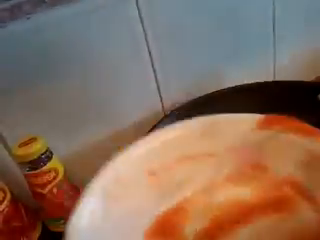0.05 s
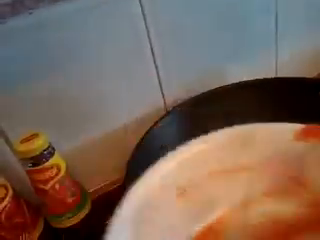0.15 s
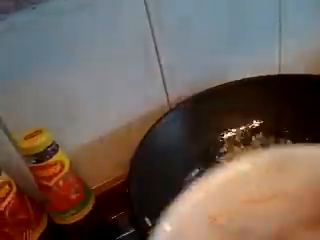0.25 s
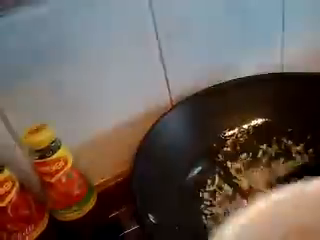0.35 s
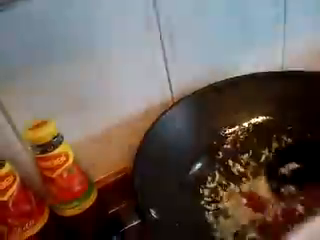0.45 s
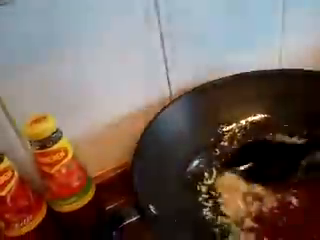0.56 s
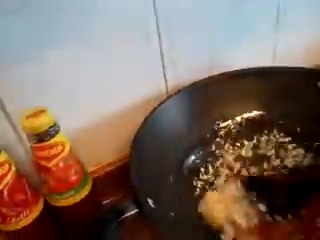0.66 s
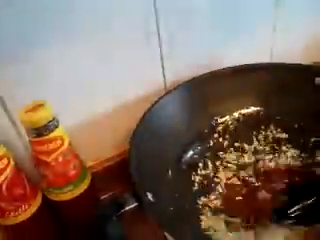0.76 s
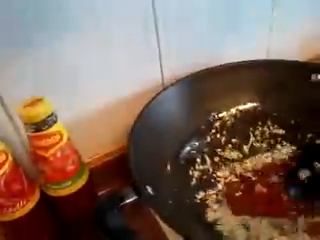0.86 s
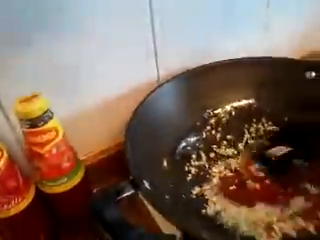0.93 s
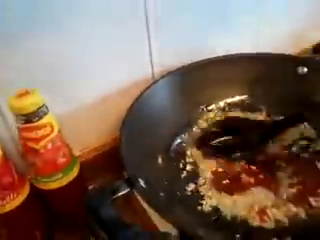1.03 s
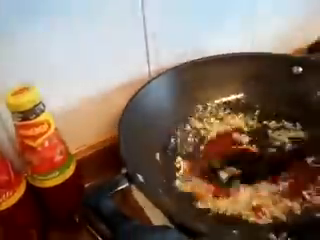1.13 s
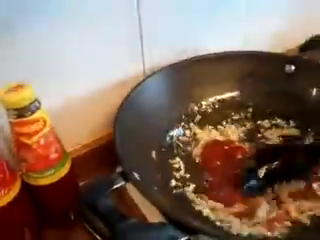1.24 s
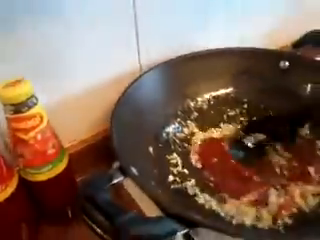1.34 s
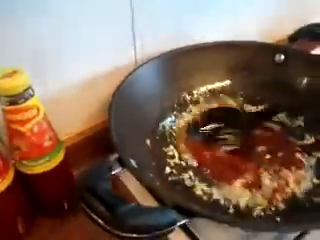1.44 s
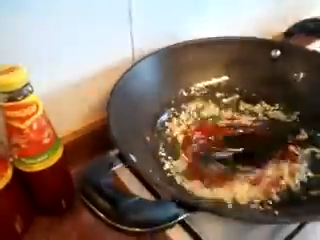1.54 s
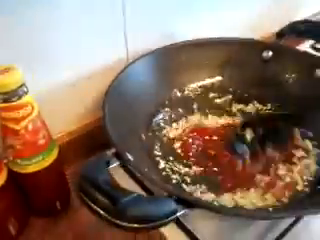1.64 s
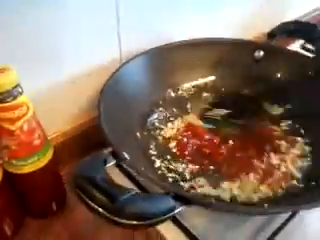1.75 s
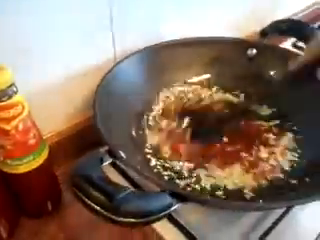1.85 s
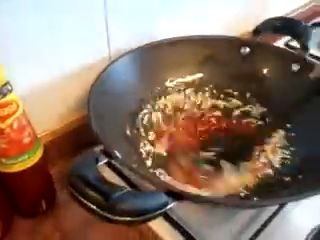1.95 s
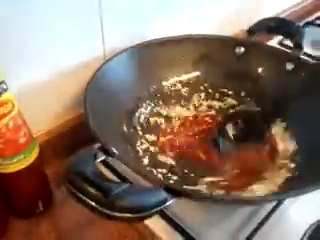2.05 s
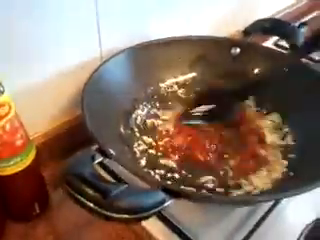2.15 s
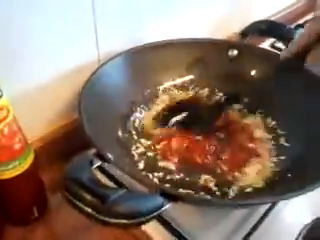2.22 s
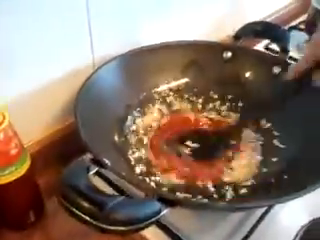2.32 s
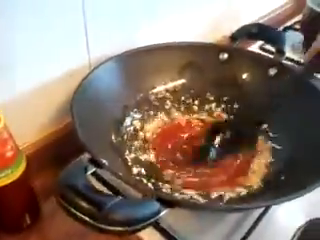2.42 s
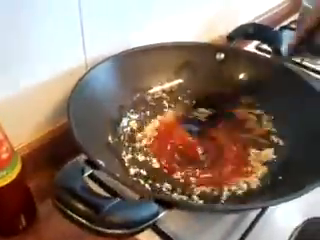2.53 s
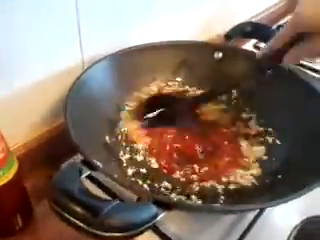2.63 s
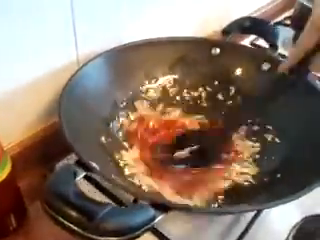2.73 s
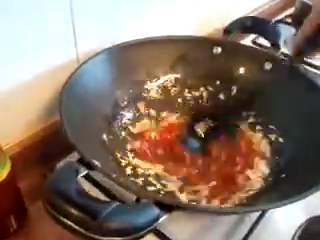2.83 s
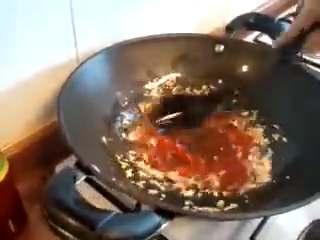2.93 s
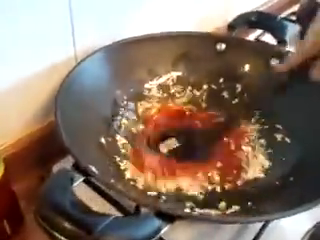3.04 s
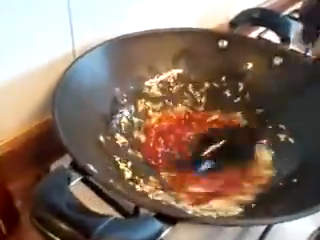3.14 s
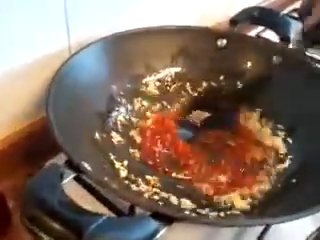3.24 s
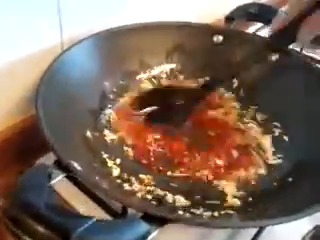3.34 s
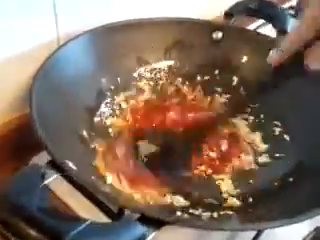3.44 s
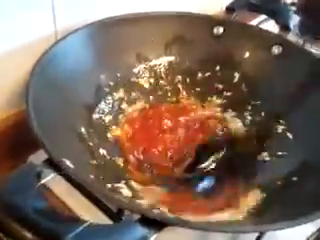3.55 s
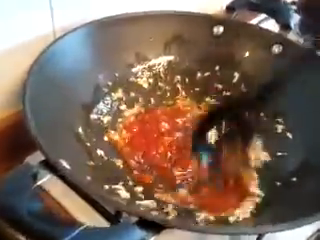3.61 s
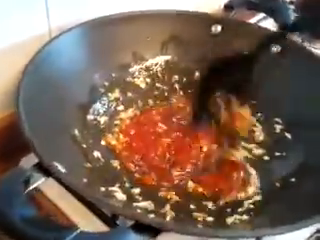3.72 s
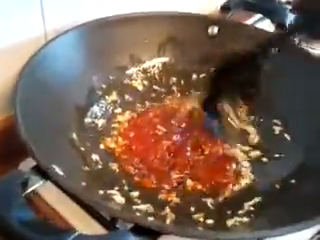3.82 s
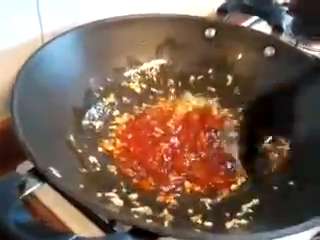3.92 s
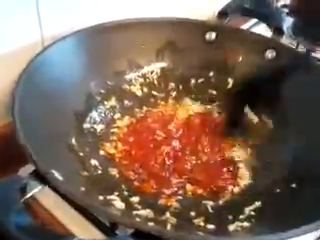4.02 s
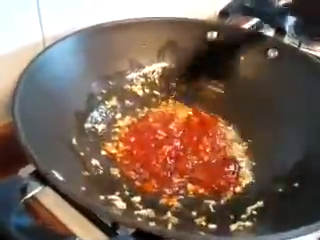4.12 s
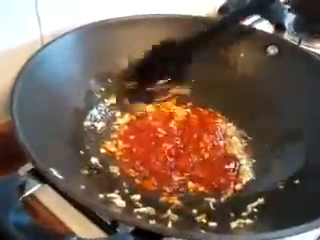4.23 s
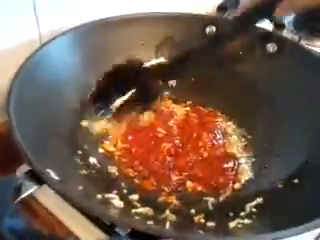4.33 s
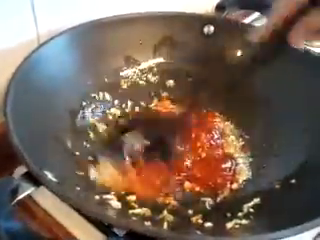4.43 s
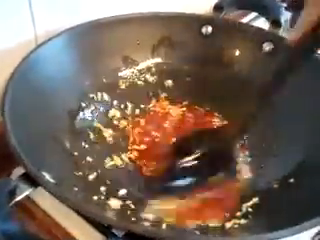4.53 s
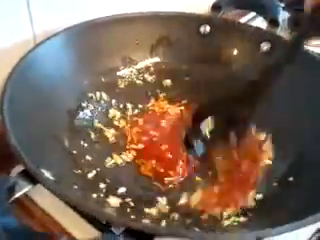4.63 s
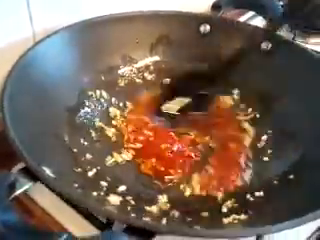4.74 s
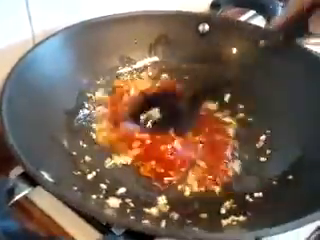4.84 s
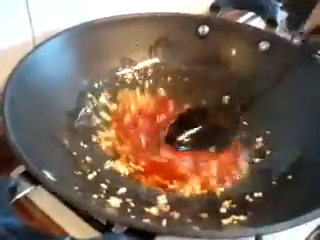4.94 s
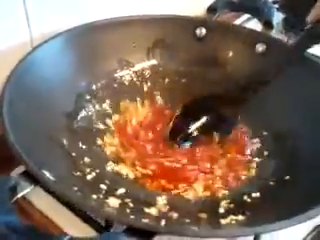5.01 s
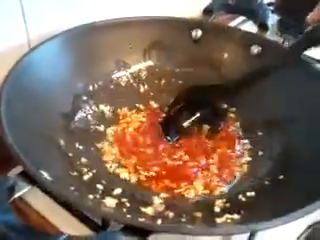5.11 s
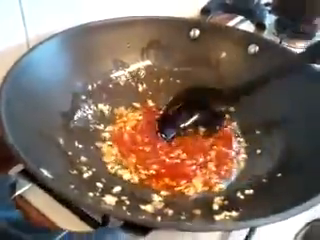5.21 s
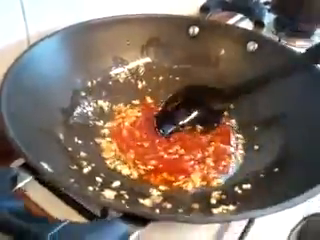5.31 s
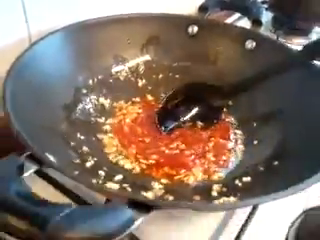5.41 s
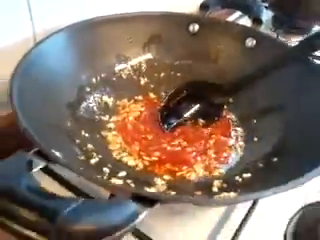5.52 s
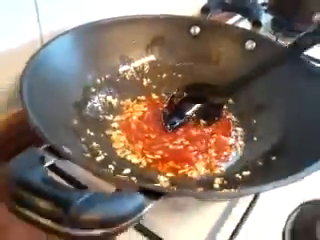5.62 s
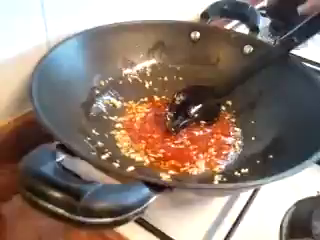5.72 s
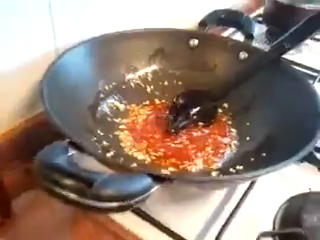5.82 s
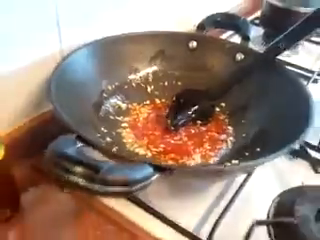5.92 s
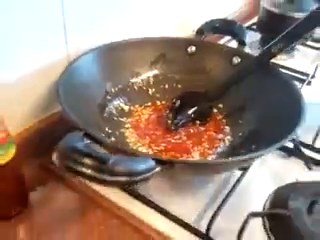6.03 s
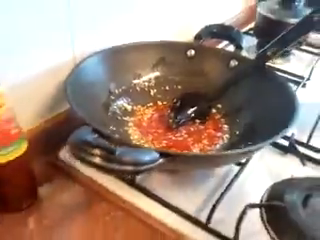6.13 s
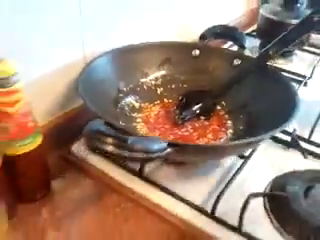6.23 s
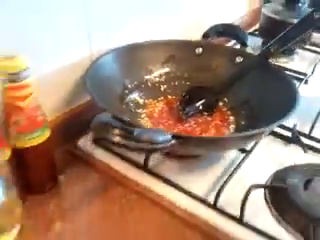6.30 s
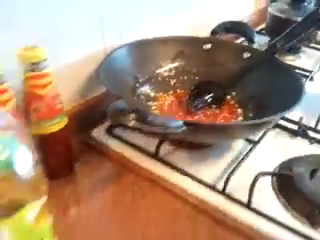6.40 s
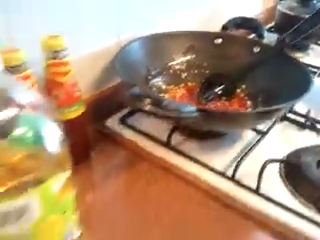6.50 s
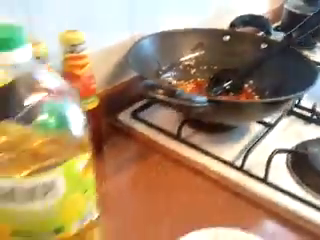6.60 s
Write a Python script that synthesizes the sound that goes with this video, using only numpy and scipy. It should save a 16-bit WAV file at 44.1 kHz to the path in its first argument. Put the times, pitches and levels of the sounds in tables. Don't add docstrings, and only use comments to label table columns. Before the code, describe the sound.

Close-up wok frying: fine fizz, crackling bubbles and wet seething, pulsing with quick spatula strokes. A loud spit and bursts of steam come near three seconds, a brief low pan groan follows, then a bright clack just after four. Late on, a few small knocks tick as the microphone backs away and the frying drops quieter, leaving low kitchen fan noise underneath.

```python
import sys
import numpy as np
from scipy import signal
from scipy.fft import rfft, irfft
from scipy.io import wavfile
from scipy.ndimage import uniform_filter1d

SR = 44100
rng = np.random.default_rng(int(sys.argv[2]) if len(sys.argv) > 2 else 0)


def bounce(signal):
    frames = np.transpose(np.atleast_2d(signal))
    limited = np.clip(frames, -1, 1)
    pcm = np.round(limited * 32767).astype(np.int16)
    wavfile.write(sys.argv[1], SR, pcm)


def convert_level_to_amplitude(level_db):
    exponent = np.asarray(level_db, float) / 20
    return 10 ** exponent


N = 293787

# lower edge in Hz, upper edge in Hz.
FRYING_BANDS = [
    (6000, 9000),
    (3800, 6000),
    (1600, 3800),
    (500, 1500),
]
# frequency in Hz, density in dB per Hz.
FRYING_SPECTRUM = [(150, -44), (260, -15), (520, -14), (900, -11), (1450, -9), (1700, -6.5), (3300, -5.5),
                   (4200, -4), (5000, -1), (6200, -4), (7500, -4), (8200, -7.5), (9200, -16)]
# frequency in Hz, width in Hz, gain in dB.
PAN_MODES = [(540, 32, 3.5), (687, 16, 9), (850, 19, 6), (1033, 81, 4), (1137, 19, 9), (1210, 20, 0.5),
             (1480, 250, -1.5), (1650, 48, 3), (1787, 14, 7.5), (1900, 23, 5.5), (2178, 15, 7),
             (2450, 17, 5), (6870, 91, 0)]
# start in seconds, length in seconds, rms level in dB,
# centre in Hz, width in Hz.
STEAM_FLARES = [(0.136, 0.054, -38, 590, 400), (0.375, 0.054, -33, 1150, 400),
                (0.384, 0.026, -27.5, 1900, 300), (1.706, 0.091, -36.5, 1750, 250),
                (2.126, 0.024, -50, 2220, 200), (2.263, 0.01, -32, 850, 300),
                (2.268, 0.083, -20, 6060, 3530), (2.298, 0.022, -19.5, 6650, 1500),
                (2.897, .01, -16, 7260, 1900), (2.994, 0.05, -27.5, 2960, 1500),
                (3.022, 0.044, -23, 5556, 3780), (3.066, 0.022, -23.5, 2730, 1600),
                (3.061, 0.03, -22.5, 5270, 3000), (3.08, 0.022, -24, 4700, 2000),
                (4.342, 0.0201, -31.5, 1930, 560), (4.838, 0.02, -27, 3430, 300),
                (4.85, .06, -30, 4760, 2500), (5.785, 0.02, -46, 1900, 900),
                (5.944, 0.036, -37.5, 2500, 1100), (5.972, 0.019, -37.5, 1720, 500),
                (6.307, 0.017, -44, 2720, 800), (6.35, .015, -51, 1740, 200),
                (6.38, 0.0152, -46, 1650, 200), (6.394, 0.074, -44, 1720, 400)]
# start in seconds, peak level in dB, pitch in Hz.
OIL_SPITS = [(0.4953, -10, 7050), (0.7407, -7, 7210), (0.9931, -9, 7400), (1.0266, -4, 7870),
             (1.5424, -8, 7580), (1.5514, -8, 6640), (1.6192, -8, 6210), (1.7669, -10, 7220),
             (1.8647, -8, 7720), (2.8985, 1, 7300), (3.0325, -9, 6500), (3.0484, -8, 5150),
             (3.0865, -9, 7300), (3.0744, -7, 4480), (4.2224, -11, 7090), (4.2465, -14, 5200),
             (4.3979, -11, 6910), (4.4523, -14, 7300), (4.6414, -13, 6840), (5.024, -11, 7680),
             (5.5209, -20, 6500), (5.5737, -17, 7230), (5.8501, -20, 7220), (5.8765, -20, 6990),
             (5.8975, -17, 6750), (6.1105, -22, 6620), (6.1978, -21, 5480), (6.2871, -22, 5480),
             (6.3789, -23, 7010), (6.5545, -26, 6360)]
# start in seconds, peak level in dB, lowest ring in Hz, T60 in seconds,
# bright crack level in dB.
SPATULA_KNOCKS = [(.887, -27, 1140, .05, -40), (2.107, -27, 1000, .05, -40), (2.69, -30, 1020, .05, -45),
                  (4.2505, -17.5, 690, .08, -7.5), (5.585, -33, 1330, .04, -45),
                  (5.6224, -11, 730, .026, -34), (5.6325, -27, 700, .025, -45),
                  (5.6375, -28, 720, .08, -45), (5.825, -23, 320, .05, -55), (5.843, -24, 660, .06, -45),
                  (5.948, -33, 550, .03, -45), (6.0175, -20, 395, .055, -55), (6.199, -30, 700, .025, -45),
                  (6.208, -27, 900, .03, -45), (6.217, -22, 600, .02, -45), (6.228, -26, 850, .025, -45)]
# ratio to the lowest ring, level in dB.
BLADE_PARTIALS = [(1, -2), (1.12, -3), (1.38, -1), (1.55, -4), (1.75, -3), (2.05, -5), (2.5, -9)]
# frequency in Hz, level in dB, T60 in seconds.
CRACK_MODES = [(1150, -10, .025), (1550, -12, .02), (2000, -11, .025), (2900, -9, .02), (3700, -8, .02),
               (4630, -5, .04), (4950, 0, .04), (5550, -4, .03), (6190, -4, .03), (6490, -2, .025),
               (6950, -1, .025), (7600, -6, .03)]
# frequency in Hz, density in dB per Hz.
ROOM_SPECTRUM = [(8.8, -30), (15, -1.5), (46, 2.5), (76, -2), (140, -3), (210, -12), (481, -14),
                 (595, -21.5), (963, -18), (1040, -23), (1150, -16.5), (1340, -18), (1500, -17),
                 (1950, -44.5), (3300, -120)]
# time in seconds, pitch in Hz, level in dB.
PAN_GROAN = [
    (3.66, 142, -60),
    (3.72, 138, -41),
    (3.8, 124, -35),
    (3.87, 116, -37),
    (3.92, 112, -60),
]
# frequency in Hz, gain in dB.
MIC_RESPONSE = [(7600, 1), (8100, -0.5), (8550, -9.5), (8850, -18), (9150, -41.5), (9300, -88.5)]
# time in seconds, level in dB.
SIZZLE_LEVEL = [(0, -18.5), (.1, -18), (.32, -19.5), (.6, -23.5), (.78, -19), (.93, -22), (1.15, -19.5),
                (1.5, -18.5), (1.68, -22.5), (1.87, -21.5), (2.0, -25.5), (2.2, -23.5), (2.72, -25.5),
                (2.95, -24.5), (4.3, -27.5), (5.2, -25.5), (5.6, -34.5), (6.66, -42.5)]
# level in dB when the sizzle is at -25 dB, share of its change (a ratio).
FRYING_LAYERS = [
    (-25.5, 0.99),
    (-29.5, 1.01),
    (-32, 0.91),
    (-42.5, 0.52),
]
# middle in seconds, length in seconds, ring in Hz, ring lift in dB,
# lift in dB of the seething, turned-over sauce.
SPATULA_STROKES = [(0.057, 0.37, 1250, 5, -0.5), (0.284, 0.35, 1190, 6.5, -3.5), (0.572, 0.34, 1308, 4, 3),
                   (0.794, 0.79, 850, 6, 1.5), (1.107, 0.4, 1000, 2.5, 0.5), (1.294, 0.3, 1000, 1, 1),
                   (1.49, .25, 750, 8, 0), (1.75, 0.34, 1050, 3.5, 0), (2.067, 0.32, 804, 7.5, 1.5),
                   (2.3, .15, 650, 12, 4), (2.54, 0.28, 1030, 3, -0.8), (2.76, 0.25, 1210, 8, -1.5),
                   (2.864, 0.17, 1000, 3.5, 1), (3.064, 0.19, 793, 0.5, 3.5), (3.284, 0.27, 1158, 5, 0.5),
                   (3.443, 0.099, 1100, 1, 2.5), (3.771, 0.26, 1400, 0.5, 3), (3.965, 0.41, 1070, 4.5, 3),
                   (4.4, 0.26, 1400, 3, 1.5), (4.672, 0.185, 1360, 5, 1), (4.95, 0.46, 1550, 4.5, -1),
                   (5.03, 0.2, 650, 7, -0.5), (5.366, 0.33, 1400, 2.5, 0.5), (5.6, 0.2, 1350, -1, 1.2)]


def evened(x):
    return x / np.sqrt(np.mean(x ** 2) + 1e-20)


def read(points, hz):
    f, value = np.transpose(points)
    return np.interp(np.log(hz + 1), np.log(f + 1), value)


def spectrum_filter(x, points):
    return irfft(rfft(x) * convert_level_to_amplitude(read(points, np.fft.rfftfreq(N, 1 / SR))), N)


def add(mix, s, sound):
    part = mix[round(s * SR):][:len(sound)]
    part += sound[:len(part)]


def resonate(x, hz, width):
    turn = np.exp(2j * np.pi * np.cumsum(hz * np.ones(len(x))) / SR)
    r = np.exp(-np.pi * width / SR)
    return 2 * (turn * signal.lfilter([1 - r], [1, -r], x / turn)).real


def bubbles(per_s, spread_db, cycles):
    out = np.zeros(N)
    for hz in np.geomspace(400, 9000, 36):
        t = np.arange(int(6 * cycles / hz * SR)) / SR * hz
        envelope = np.exp(-t / cycles) * (1 - np.exp(-t / 0.56))
        pop = envelope * np.sin(2 * np.pi * t * (1 + 0.01043 * t))
        chance, size = rng.random(N), rng.exponential(1, N)
        strength = convert_level_to_amplitude(spread_db * np.sqrt(hz / 9000) * np.minimum(size, 4))
        train = (chance < per_s / SR) * strength
        out += evened(signal.oaconvolve(train, pop)[:N]) * np.sqrt(hz / 4000)
    return evened(out)


def crackle(per_s, spread_db):
    chance, size, sign = rng.random(N), rng.exponential(1, N), rng.choice([-1., 1.], N)
    scatter = 0.31 * rng.standard_normal(200) * np.exp(-np.arange(200) / 60)
    scatter[0] = 1
    clicks = (chance < per_s / SR) * sign * convert_level_to_amplitude(spread_db * np.minimum(size, 4))
    return evened(signal.oaconvolve(clicks, scatter)[:N])


def swells(t):
    s, length = np.transpose(SPATULA_STROKES)[:2]
    return np.cos(np.pi * np.clip((t[:, None] - s) / length, -.5, .5)) ** 2


def layer_levels(t):
    sizzle = np.interp(t, *np.transpose(SIZZLE_LEVEL)) + 25
    lift = swells(t) @ np.transpose(SPATULA_STROKES)[4]
    stirring = [0.88, 0.42, 1, 0]
    return [db + share * sizzle + stir * lift for (db, share), stir in zip(FRYING_LAYERS, stirring)]


def stroke_ring(t, hz):
    ring_hz, ring_db = np.transpose(SPATULA_STROKES)[2:4]
    ring_octaves = 0.56
    distance = np.log2((hz[:, None] + 1) / ring_hz) / ring_octaves
    return ring_db * np.exp(-.5 * distance ** 2) @ swells(t).T


def frying():
    fizz = bubbles(per_s=150, spread_db=4.0, cycles=7.0)
    source = 0.79 * fizz + 0.74 * crackle(per_s=500, spread_db=2.0) + 1.67 * rng.standard_normal(N)
    hz, t, z = signal.stft(source, SR, nperseg=512, noverlap=384)
    mean_power = uniform_filter1d(np.mean(abs(z) ** 2, axis=1), size=5)
    z = z / np.sqrt(mean_power)[:, None]

    colour = read(FRYING_SPECTRUM, hz)
    band_db = [10 * np.log10(np.sum(convert_level_to_amplitude(2 * colour[(hz > lo) & (hz < hi)]))) for lo, hi in FRYING_BANDS]
    centres = [7000, 4900, 2500, 1000]  # Hz, one for each layer
    weights = np.array([read(sorted(zip(centres, row)), hz) for row in np.eye(len(centres))])
    drive = np.array([level - own for level, own in zip(layer_levels(t), band_db)])

    chance = rng.standard_normal((len(t), len(hz))).T
    patches = evened(uniform_filter1d(uniform_filter1d(chance, size=6, axis=0), size=16, axis=1))
    gusts = evened(uniform_filter1d(rng.standard_normal(len(t)), size=8))
    field_db = colour[:, None] + weights.T @ drive + stroke_ring(t, hz) + 1.0 * patches + 0.71 * gusts
    fry = signal.istft(z * convert_level_to_amplitude(field_db - 3.5), SR, nperseg=512, noverlap=384)[1][:N]

    fine_hz = np.fft.rfftfreq(N, 1 / SR)
    pan_db = sum(db / (1 + (2 * (fine_hz - f) / w) ** 2) for f, w, db in PAN_MODES)
    return irfft(rfft(fry) * convert_level_to_amplitude(pan_db), N)


def kitchen():
    t = np.arange(N) / SR
    a, b, c, *slow = rng.standard_normal((5, N))
    wobble_hz = 4
    throb_wobble, drone_wobble = (evened(resonate(resonate(v, 0, wobble_hz), 0, wobble_hz)) for v in slow)
    wander = evened(resonate(resonate(a, 0, 3.0), 0, 3.0))
    throb = np.sqrt(2) * np.sin(2 * np.pi * (28.9 * t + .08 * wander))
    drone = evened(resonate(resonate(b, 111.7, 33), 111.7, 33))
    air = evened(spectrum_filter(c, ROOM_SPECTRUM))
    groan_s, hz, db = np.transpose(PAN_GROAN)
    groan_phase = 2 * np.pi * np.cumsum(np.interp(t, groan_s, hz)) / SR
    groan = convert_level_to_amplitude(np.interp(t, groan_s, db, -120, -120)) * np.sin(groan_phase)
    fan = convert_level_to_amplitude(-42 + 1.5 * throb_wobble) * throb + convert_level_to_amplitude(-49 + 1.5 * drone_wobble) * drone
    return fan + convert_level_to_amplitude(-42.5) * air + groan


def flares():
    out = np.zeros(N)
    for s, length, db, hz, width in STEAM_FLARES:
        a, b = rng.standard_normal((2, SR // 4))[:, :int(length * SR)]
        sputter = a * convert_level_to_amplitude(3.0 * evened(uniform_filter1d(b, size=90)))
        jet = evened(resonate(resonate(sputter, hz, width), hz, width))
        add(out, s, convert_level_to_amplitude(db) * jet * signal.windows.tukey(len(a), .7))
    return out


def spits():
    out = np.zeros(N)
    decay = convert_level_to_amplitude(-60 * np.arange(SR // 8) / SR / .016)
    for s, db, hz in OIL_SPITS:
        noise = resonate(resonate(rng.standard_normal(SR // 8), hz, 3000), hz, 3000)
        burst = noise * decay
        add(out, s, convert_level_to_amplitude(db - 6) * burst / abs(burst).max())
    return out


def ring(hz, db, t60, phase=0):
    t = np.arange(SR // 8) / SR
    return convert_level_to_amplitude(db - 60 * t / t60) * np.sin(2 * np.pi * hz * t + phase)


def knocks():
    out, t = np.zeros(N), np.arange(SR // 8) / SR
    for s, db, hz, t60, crack_db in SPATULA_KNOCKS:
        phases = rng.random(len(CRACK_MODES)) * 2 * np.pi
        body = sum(ring(hz * ratio, db + d - 6, t60 / ratio) for ratio, d in BLADE_PARTIALS)
        crack = sum(ring(f, crack_db + d - 7, decay, p) for (f, d, decay), p in zip(CRACK_MODES, phases))
        crack = crack * (1 + .35 * rng.standard_normal(len(crack)))
        crack_rise, body_rise = 1 - np.exp(-t / .0008), 1 - np.exp(-t * hz / .8)
        add(out, s, crack * crack_rise - body * body_rise)
    return out


def scene():
    hits = knocks() + spits()
    scatter_db, scatter_t60 = -36, .13
    echo = rng.standard_normal(SR // 8) * convert_level_to_amplitude(scatter_db - 60 * np.arange(SR // 8) / SR / scatter_t60)
    echo[[0, 128, 255, 410, 700]] = [1, .2, .15, -.12, .1]
    return (frying() + flares() + signal.oaconvolve(hits, echo)[:N] + kitchen())[None]


def band_limit(x):
    return signal.sosfilt(signal.butter(12, 9210, fs=SR, output="sos"), x)


def record(dry):
    heard = spectrum_filter(dry, MIC_RESPONSE)
    return band_limit(heard - .0013)


dry = scene()
out = record(dry)
bounce(out)
```